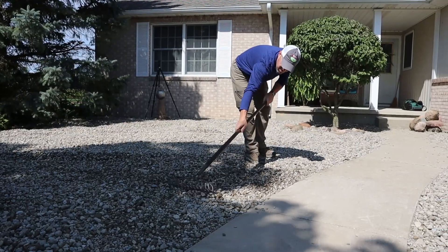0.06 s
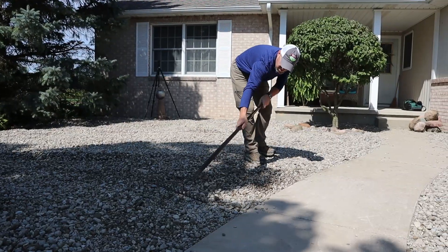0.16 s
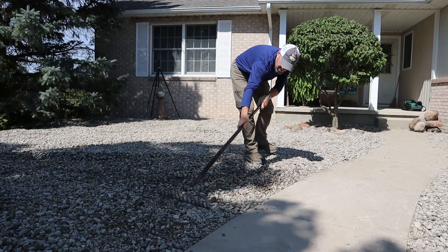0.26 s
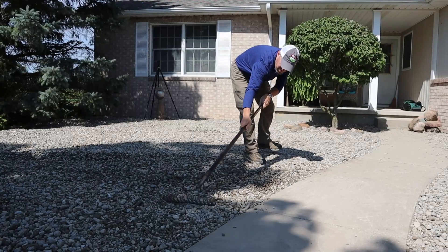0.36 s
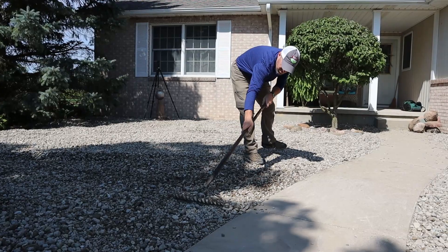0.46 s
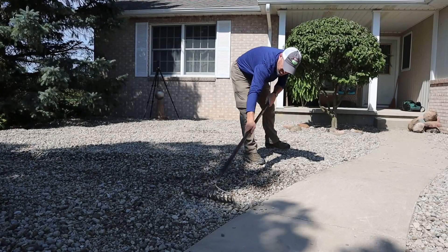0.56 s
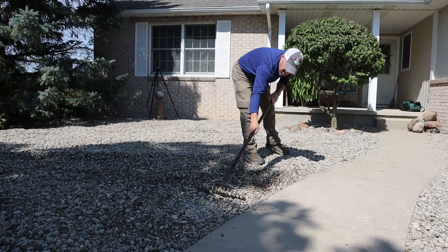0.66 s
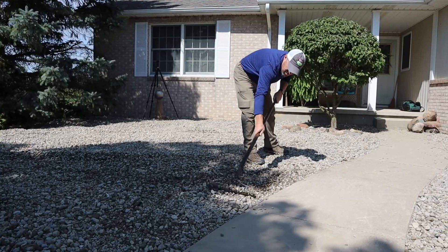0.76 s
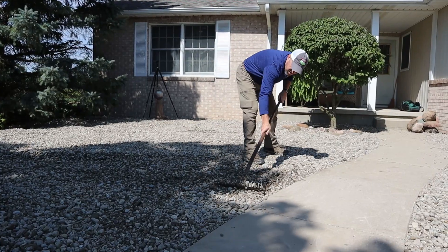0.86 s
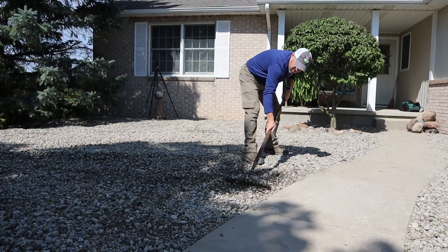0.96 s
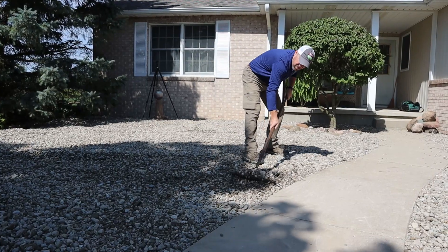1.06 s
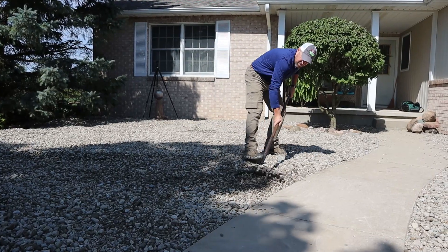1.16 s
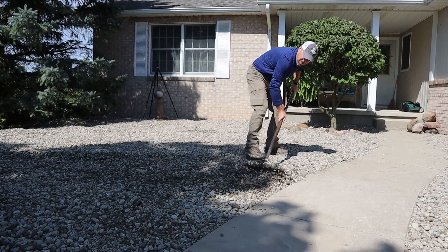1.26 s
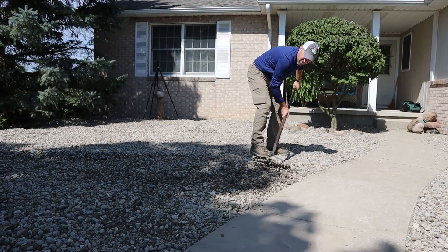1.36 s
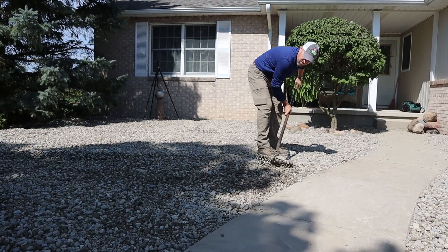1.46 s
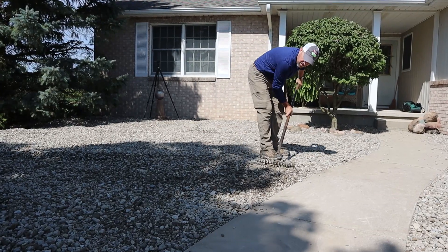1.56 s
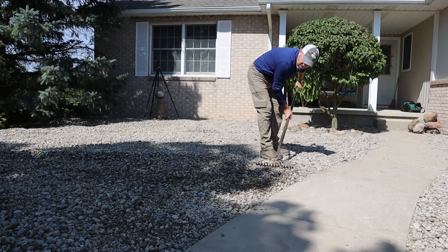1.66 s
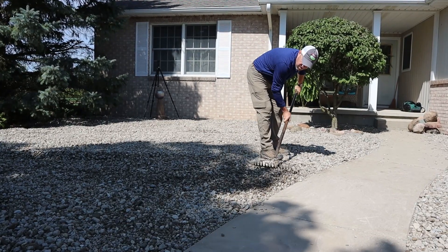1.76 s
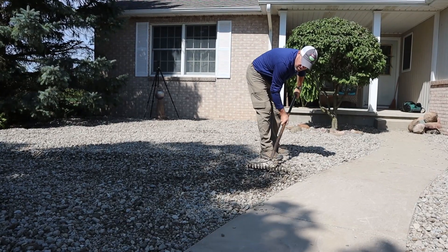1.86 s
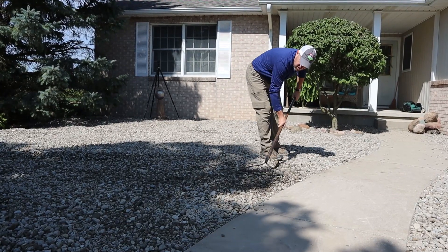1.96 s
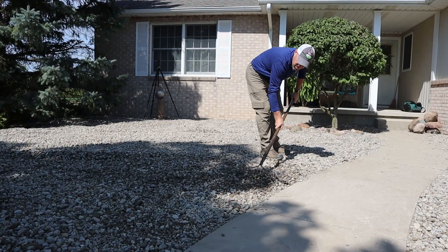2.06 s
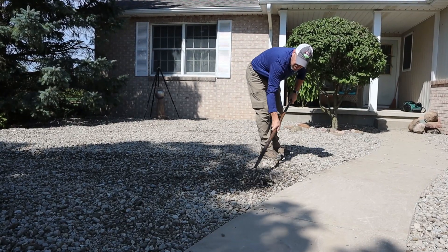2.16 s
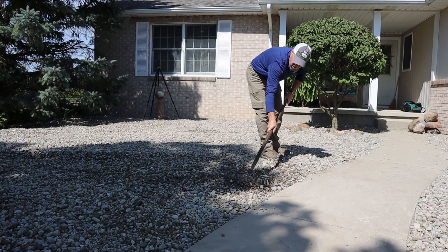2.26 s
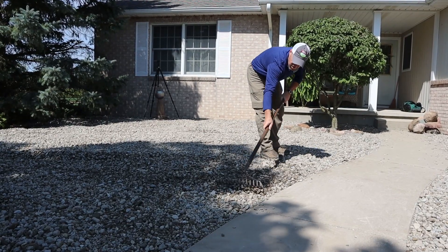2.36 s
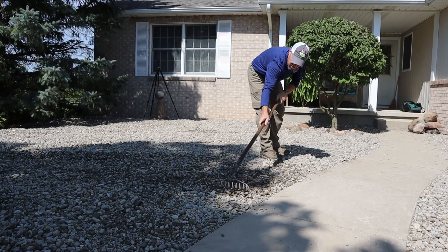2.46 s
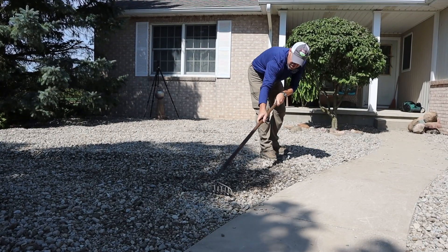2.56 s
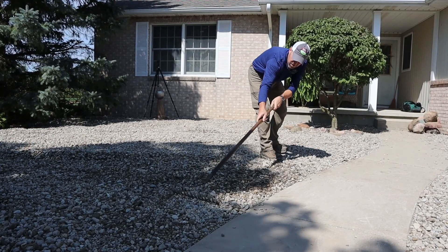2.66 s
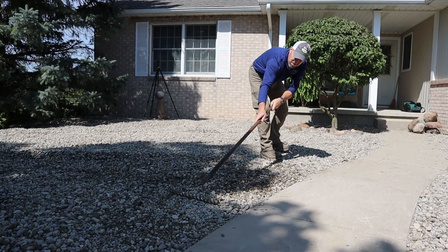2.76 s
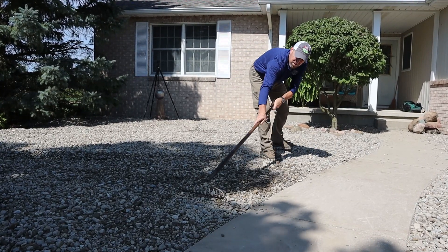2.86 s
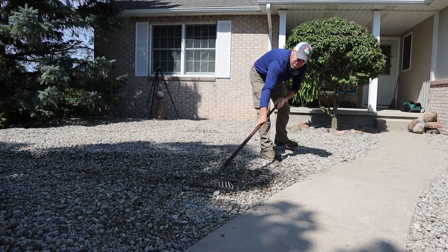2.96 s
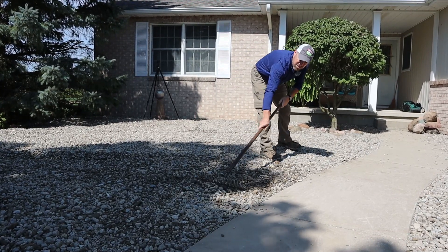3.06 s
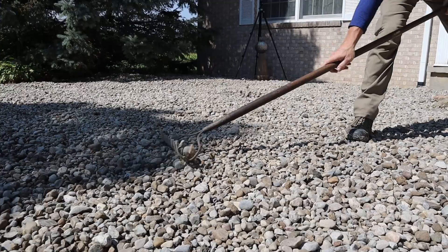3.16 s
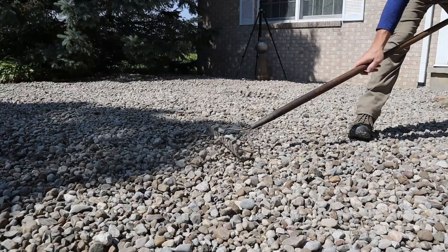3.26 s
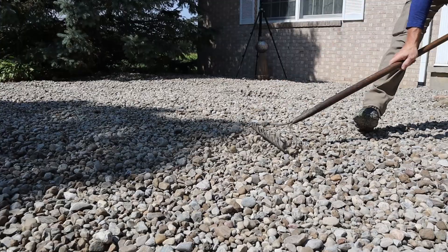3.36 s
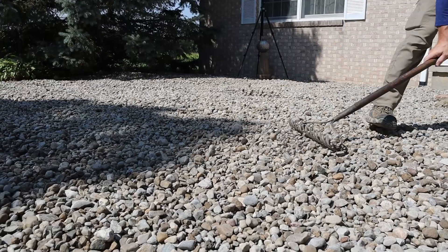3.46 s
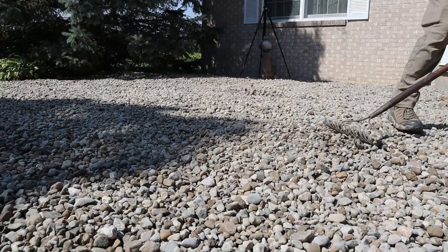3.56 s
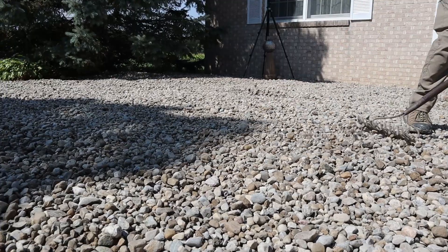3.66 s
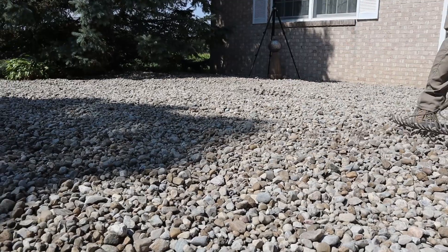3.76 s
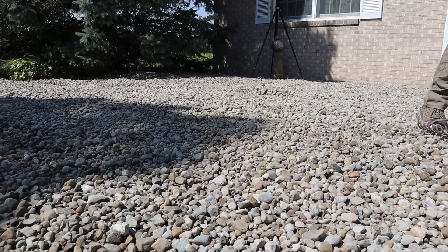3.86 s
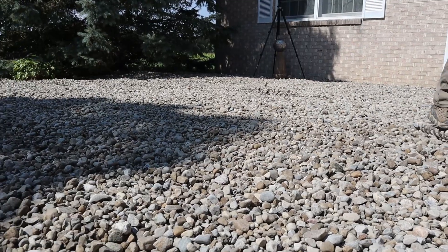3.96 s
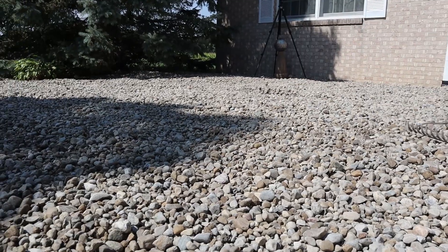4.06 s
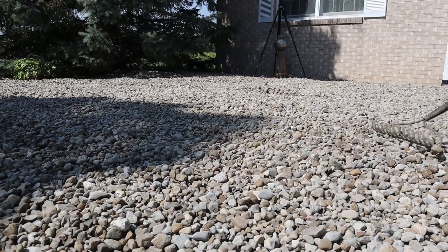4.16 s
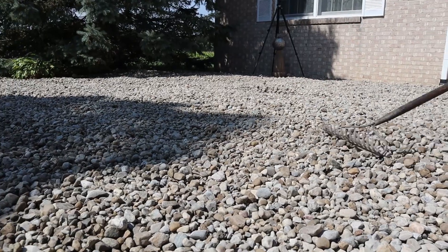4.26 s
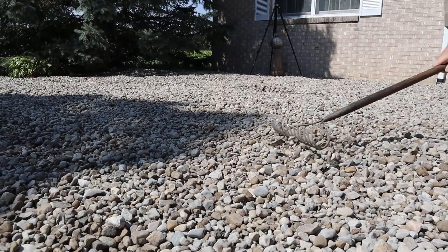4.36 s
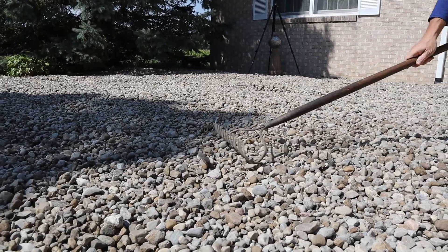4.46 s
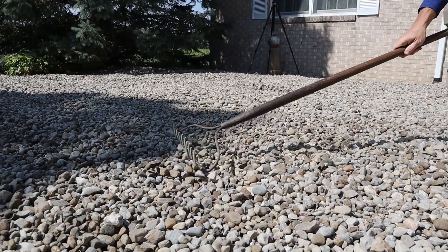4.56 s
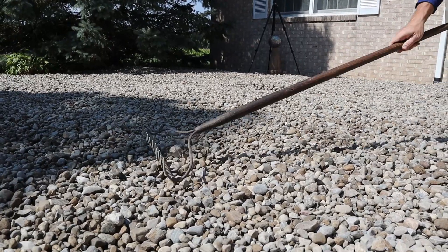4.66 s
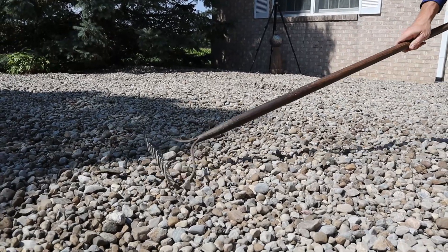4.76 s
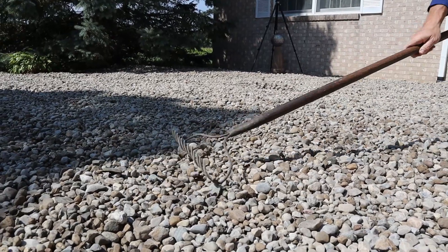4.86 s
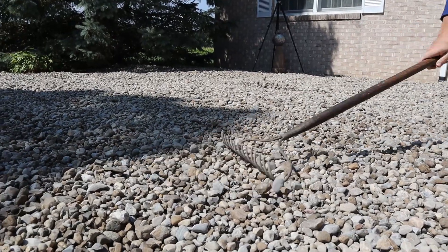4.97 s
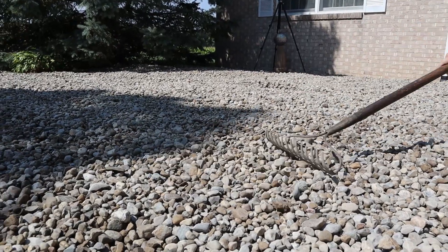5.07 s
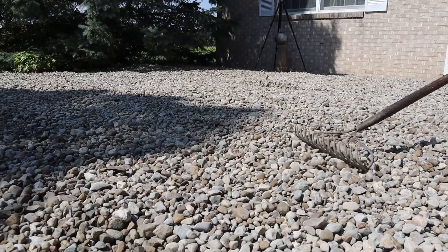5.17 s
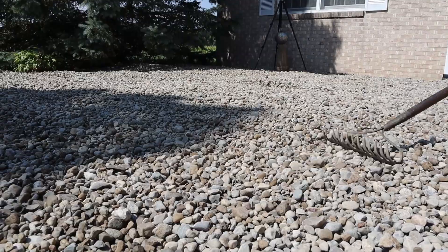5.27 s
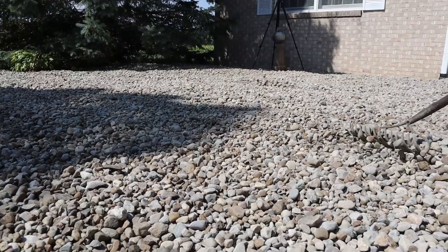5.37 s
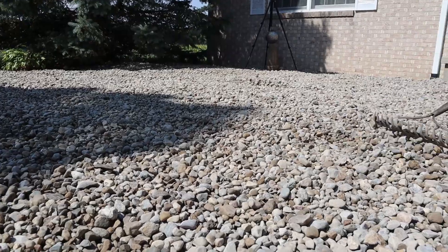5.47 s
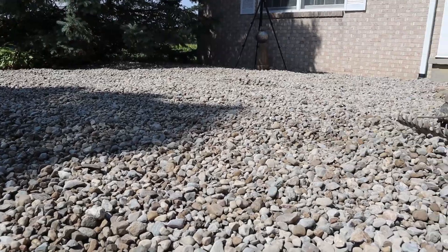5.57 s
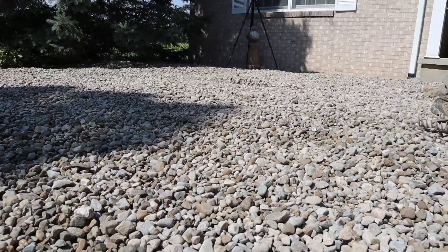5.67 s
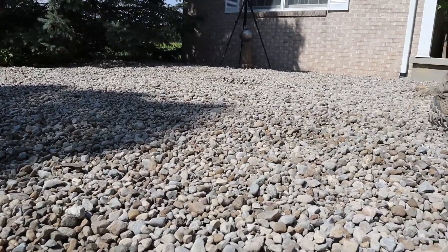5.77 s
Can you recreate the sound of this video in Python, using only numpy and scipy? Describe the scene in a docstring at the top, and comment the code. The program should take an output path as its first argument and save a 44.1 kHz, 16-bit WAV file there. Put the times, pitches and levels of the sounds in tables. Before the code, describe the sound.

A steel rake is dragged in uneven strokes through a bed of loose rounded stones. Dense clicking and rattling comes in bursts, with hard clinks and short metallic rings when the head is jerked. Quieter settling separates the strokes. Close, mono outdoor sound, with slight dull reflections from path and house wall over faint distant traffic.

```python
"""Stones click against each other in dense clumps as a steel rake is dragged and pushed through them;
the steel rings when knocked, hard jerks of the head clatter, and far traffic rumbles below.
The loose rounded stones lie in front of a house wall. Stones and steel are resonators struck by random
contacts, the dull crunch and the rumble are filtered noise, and the wall returns delayed, duller copies."""
import sys
import numpy as np
from scipy import signal
from scipy.io import wavfile

SR = 44100
rng = np.random.default_rng(int(sys.argv[2]) if len(sys.argv) > 2 else 0)


def amplitude_ratio(level_db):
    """Convert a level in decibels to the matching linear amplitude (field) ratio."""
    exponent = np.asarray(level_db, float) / 20
    return 10 ** exponent


def transcribe(u):
    """Save the signal u as a 16-bit wav file named by the first command-line argument.

    u: samples, shape (n,) or (channels, n), limited to [-1, 1]; the rate is SR.
    q: integer samples, one column per channel.
    """
    v = np.clip(np.atleast_2d(u).T, -1, 1)
    q = np.round(v * 32767).astype(np.int16)
    wavfile.write(sys.argv[1], SR, q)


N = 256353   # length in samples


def rms_one(x):
    """Normalisation: scale a signal to rms 1."""
    return x / np.sqrt(np.mean(x ** 2) + 1e-20)


def in_time(rows):
    """Linear interpolation: a curve given at times in seconds is read once a sample."""
    s, *columns = np.transpose(rows)
    return [np.interp(np.arange(N) / SR, s, c) for c in columns]


def at_hz(points, hz):
    """Spectral envelope: levels are interpolated on a log-frequency axis."""
    envelope_hz, envelope_db = np.transpose(points)
    return np.interp(np.log(hz), np.log(envelope_hz), envelope_db)


def drift(rate_hz):
    """Low-passed noise: a slow random fluctuation of rms 1, made at 1/40 of the sample rate."""
    r = np.exp(-80 * np.pi * rate_hz / SR)
    white = rng.standard_normal(N // 40 + 2002)
    slow = signal.lfilter([1], [1, -2 * r, r * r], white)[2000:]   # skip the filter's start
    return np.interp(np.arange(N) / 40, np.arange(len(slow)), rms_one(slow))


def ring(clicks, hz, t60):
    """Damped resonance: a unit click starts a sine of height 1 that falls 60 dB in t60 seconds."""
    r = amplitude_ratio(-60 / (t60 * SR))
    w = 2 * np.pi * min(hz, SR / 2.2) / SR
    return signal.lfilter([0, np.sin(w)], [1, -2 * r * np.cos(w), r * r], clicks + 1e-18)


def click(s, db):
    """Impulse excitation: a single sample at s seconds."""
    return amplitude_ratio(db) * (np.arange(N) == round(s * SR))


def band(x, low_hz, high_hz):
    """Band-pass filtering: only the part between two frequencies is kept."""
    return signal.sosfilt(signal.butter(2, [low_hz, high_hz], "band", fs=SR, output="sos"), x)


def contacts(per_s, spread_db, clump_db):
    """Random point process: contacts of uneven strength and either sign, coming in clumps."""
    sizes = amplitude_ratio(spread_db * np.minimum(rng.exponential(1, N), 5)) * rng.choice([-1, 1], N)
    chance = per_s * amplitude_ratio(clump_db * drift(25.0)) / SR
    return sizes * (rng.random(N) < chance)


def jolts(per_s, fade_s):
    """Stick-slip: tines catch and let go, so the rattle jumps up at once and fades."""
    kicks = rng.uniform(0, 1.74, N) * (rng.random(N) < per_s / SR)
    fading = signal.lfilter([1], [1, -np.exp(-1 / (fade_s * SR))], kicks + 1e-18)
    return np.sqrt(0.54 + fading)


def by_size(hz, small_db, large_db):
    """Size and pitch: high pitches follow the small stones, low pitches the large ones."""
    smallness = np.clip(np.log2(hz / 6540) * 2.5, 0, 1)
    largeness = np.clip(np.log2(3780 / hz) * 3, 0, 1)
    return smallness * small_db + largeness * large_db


def gesture(start_s, length_s, first_db, last_db, attack_s, release_db_per_s, swell_db=0):
    """Power envelope of one movement: a quick rise, a steady change with a swell, then a fall."""
    t = np.arange(N) / SR - start_s
    part = np.clip(t / length_s, 0, 1)
    db = first_db + (last_db - first_db) * part + swell_db * 4 * part * (1 - part)
    db = db - release_db_per_s * np.maximum(t - length_s, 0)
    return (amplitude_ratio(db) * np.clip(t / attack_s, 0, 1)) ** 2


# The rake moves through the bed. Each row: start in seconds, length in seconds, level in dB at the start,
# level in dB at the end, large stones in dB above the middle ones.
DRAGS = [(0.0, 0.079, -11, -37.5, -2.5), (0.051, 0.087, -24.5, -25, -5), (0.5415, 0.21, -23, -26, 0),
         (0.753, 0.66, -19.5, -27, -3.5), (1.396, 0.23, -32, -30, -21), (1.65, 0.45, -34.5, -22.5, -0.5),
         (2.112, 0.33, -26.5, -31.5, 0), (2.45, 0.064, -29.5, -27.5, -4), (2.622, 0.13, -27.5, -31, 4.5),
         (3.122, 0.65, -21, -25, 3.5), (3.809, 0.35, -34, -31, -1), (4.137, 0.12, -22.5, -28.5, 1),
         (4.249, 0.225, -19.5, -20.5, 1), (4.496, 0.15, -30.5, -28.5, 0.5),
         (4.575, 0.15, -17.5, -26.5, 4.5), (4.75, 0.074, -39, -33, 1.5), (5.036, 0.29, -22.5, -26.5, 3),
         (5.337, 0.052, -24.5, -18.5, -0.5), (5.419, 0.41, -27, -29.5, -5.5)]
# Share of small stones where the rake works. Each row: time in seconds, level in dB above the middle stones.
GRIT = [(0, 2.5), (0.6, 1.5), (2.0, 3.5), (3.1, 6.5), (3.6, -1), (3.9, -2.5), (4.3, 2.5), (4.7, 3),
        (5.3, 2.5), (5.81, 1)]


def drags():
    """Friction strokes: power of each drag, with its small and large stones in dB above the middle."""
    return [(gesture(s, length, first_db, last_db, attack_s=0.001, release_db_per_s=348, swell_db=2),
             np.interp(s + length / 2, *np.transpose(GRIT)), large_db)
            for s, length, first_db, last_db, large_db in DRAGS]


# A few stones slip and settle. Each row: start in seconds, level in dB, small stones and large stones
# in dB above the middle ones.
SLIPS = [(0.21, -32, 4.5, -24), (0.332, -27, -6.5, 1), (0.453, -37.5, -6, -6), (0.491, -33.5, 1, 5),
         (0.5165, -34.5, -8, -1), (2.917, -32, -1, -4.5), (2.962, -22, -3.5, -5.5), (3.019, -22, -3, -3),
         (4.807, -29, 1, 7.5), (4.877, -29.5, -1, -9), (4.899, -36, 2, 12.5), (4.955, -28, 0.5, 7)]


def slips():
    """Granular settling: power of each 9 ms slip, with its small and large stones in dB above the middle."""
    return [(gesture(s, 0.009, db, db, attack_s=0.001, release_db_per_s=290), small_db, large_db)
            for s, db, small_db, large_db in SLIPS]


# The head is jerked hard into the stones. Each row: start in seconds, length in seconds, level in dB
# at the start, level in dB at the end.
JERKS = [(1.238, 0.16, -19.5, -17.5), (2.1505, 0.022, -17, -14.5), (2.5427, 0.07, -13, -14.5)]


def jerks():
    """Impulsive forcing: power of each hard jerk of the head."""
    return [gesture(*row, attack_s=0.001, release_db_per_s=274) for row in JERKS]


def motion():
    """Power summation: dB level of the middle stones, and of the small and large ones above them."""
    moves = drags() + slips() + [(power, -6.5, -4.5) for power in jerks()]
    sizes = amplitude_ratio(-46.5) ** 2   # stones settling on their own
    for power, small_db, large_db in moves:
        sizes = sizes + power * amplitude_ratio(np.array([[0], [small_db], [large_db]])) ** 2
    middle_db, small_db, large_db = 10 * np.log10(sizes)
    return middle_db, small_db - middle_db, large_db - middle_db


# Spectral envelope of the stones. Each row: frequency in Hz, relative density in dB per Hz.
STONES = [(530, -38), (900, -7), (1390, -7.5), (1600, -6.5), (2170, -9.5), (2760, -10.5), (3470, -5),
          (6410, -4.5), (9650, -7.5), (13200, -20.5), (16000, -39)]


def stones(middle_db, small_db, large_db):
    """Impact resonance: each contact rings one stone, its size sets pitch and decay; gentle means sparser."""
    busy = amplitude_ratio(.5 * np.clip(middle_db + 25, -30, 5))
    rattle = jolts(45, .012)
    hits = contacts(8000 * busy, spread_db=1.7, clump_db=2) * rattle / np.sqrt(busy)
    pitches = np.geomspace(1000, 15700, num=40)
    dealt = rng.integers(0, len(pitches), N)   # which pitch a contact falls to
    out = np.zeros(N)
    for k, hz in enumerate(pitches):
        level_db = middle_db + by_size(hz, small_db, large_db) + 2.0 * drift(8.0)
        voice = rms_one(ring(hits * (dealt == k), hz, 0.008 * (4000 / hz) ** 1.1))
        # pitches are spaced in proportion to hz: the root turns density into level
        out += voice * amplitude_ratio(level_db + at_hz(STONES, hz) - 10.0) * np.sqrt(hz / 4000)
    hardest = contacts(90, spread_db=2.5, clump_db=3) * rattle
    snaps = rms_one(band(hardest, 2500, 10500))
    out += snaps * amplitude_ratio(middle_db + small_db / 2 - 9)
    # no stone rings lower than this
    return signal.sosfilt(signal.butter(8, 960, "high", fs=SR, output="sos"), out)


# Weight on the bed of stones. Each row: time in seconds, dull crunch in dB before the motion's share is added.
BED = [(0, -25.5), (2.6, -24), (3.1, -29), (4.6, -31.5), (5.81, -26.5)]


def bed(middle_db, small_db, large_db):
    """Low-frequency granular noise: stones shifting under weight give a dull, lumpy crunch."""
    # heavy stones press the bed most
    crunch_db = 0.5 * (middle_db + large_db) - .5 * small_db + in_time(BED)[0]
    return amplitude_ratio(crunch_db) * rms_one(band(contacts(2000, spread_db=4.0, clump_db=3.0), 160, 1120))


# Modes of the rake head. Each row: frequency in Hz, relative level in dB, 60 dB decay time in seconds.
RAKE = [(1122, 1.5, 0.035), (5930, -3, 0.09), (1400, 3.5, 0.031), (2097, -5.5, 0.055), (2230, 0, 0.031),
        (2587, -1, 0.049), (2940, -8, 0.075), (3134, -10, 0.056), (3495, 0.5, 0.056), (4455, -2, 0.037),
        (4750, -1, 0.047), (5480, 4, 0.04), (6730, 3, 0.032)]
# Tine tips that each ring a note of their own, in Hz.
TIPS_HZ = [9200, 9500, 10030, 10700, 11350]


def rake(middle_db, small_db, large_db, crack):
    """Modal synthesis: stones and knocks excite the steel, jerks the middle modes; each tip's level wavers."""
    hits = rms_one(contacts(600, spread_db=2.5, clump_db=3.0))
    jerk = rms_one(contacts(500, spread_db=1.0, clump_db=4.0)) * amplitude_ratio(-28.5) * np.sqrt(sum(jerks()))
    tips = [(hz, 3 * drift(6), 0.032) for hz in TIPS_HZ]
    out = np.zeros(N)
    for hz, db, t60 in RAKE + tips:
        size_db = by_size(hz, 2.3 * small_db, 1.03 * large_db)
        drive = hits * amplitude_ratio(middle_db - 0.64 * small_db + size_db - 39.0)
        drive = drive + jerk * (2000 < hz < 5000) + amplitude_ratio(-33.5) * crack
        wander = amplitude_ratio(db + 3.5 * drift(20))   # each mode with a strength of its own
        out += ring(drive * wander * rng.standard_normal(N), hz, t60)
    return out


# Spectral envelope of the rumble. Each row: frequency in Hz, relative density in dB per Hz.
TRAFFIC = [(25, 25), (115, 22.5), (648, -12.5), (1970, 4), (5250, 1.5), (15600, -25)]
# Overall level of the rumble. Each row: time in seconds, level in dB.
TRAFFIC_DB = [(0, -42.5), (3.1, -43.5), (3.2, -46.5), (5.81, -49.5)]


def traffic():
    """Band-shaped noise: far rumble in half-octave bands, each wavering."""
    edges = 30 * 2 ** np.arange(0, 9.1, .5)
    white = rng.standard_normal((2, N))   # neighbouring bands take turns
    rumble = np.zeros(N)
    for k, (low, high) in enumerate(zip(edges, edges[1:])):
        level_db = at_hz(TRAFFIC, np.sqrt(low * high)) + 2.3 * drift(2.7)
        rumble += band(white[k % 2], low, high) * amplitude_ratio(level_db)
    return amplitude_ratio(in_time(TRAFFIC_DB)[0]) * rms_one(rumble)


# Single hard knocks. Each row: time in seconds, nominal strength in dB, pitch of the struck stone in Hz.
KNOCKS = [(0.0785, -9.5, 7300), (0.085, -21.5, 1330), (0.1424, -15.5, 7200), (0.211, -26, 7440),
          (0.3365, -15, 5170), (0.4525, -15, 10700), (0.543, -12, 4600), (0.558, -16.5, 3900),
          (0.64, -33, 9000), (0.675, -10.5, 4300), (0.688, -23, 8500), (0.7441, -15, 4330),
          (0.8376, -9, 10300), (0.8651, -15, 10300), (0.967, -13, 2200), (1.1337, -8.5, 10200),
          (1.2425, -9, 4970), (1.3026, -6.5, 4740), (1.3512, -7.5, 2400), (1.375, -7, 4430),
          (1.398, -6, 6730), (1.553, -26, 4300), (2.149, -10, 2220), (2.1642, -6.5, 2450),
          (2.5281, -8.5, 11200), (2.5487, -5, 2440), (2.566, -14, 2220), (2.779, -13, 8060),
          (3.1779, -7.5, 4230), (4.139, -17, 10900), (4.2502, -5.5, 5700), (4.2751, -6.5, 5370),
          (4.322, -4, 5930), (4.4126, -9.5, 1490), (4.5905, -11, 5130), (4.9076, -15.5, 1400),
          (4.9556, -14, 4870), (5.068, -9, 3040), (5.148, -11.5, 1400), (5.3351, -11, 5600),
          (5.634, -13.5, 5530), (5.7156, -17.5, 10700)]


def knocks():
    """Impact excitation: a burst of contacts cracks around the stone's note; the crack also drives the steel."""
    drive, out, first = np.zeros((3, N))
    t = np.arange(SR // 16) / SR
    chatter = rng.standard_normal((len(KNOCKS), len(t))) ** 3
    for (s, db, hz), burst in zip(KNOCKS, chatter):
        burst = amplitude_ratio(db) * burst * amplitude_ratio(-17.5 - 60 * t / 0.065)
        burst[0] = amplitude_ratio(db - 4)   # the first contact is the hardest
        i = round(s * SR)
        crack = band(burst, hz / 1.63, min(hz * 2.32, 15000))
        note = amplitude_ratio(-12.5) * ring(burst, hz, 37.0 / hz)
        drive[i:i + len(t)] += crack[:N - i]
        out[i:i + len(t)] += (crack + note)[:N - i]
        first[i] = amplitude_ratio(db + 11)
    return drive, out + band(first, 1200, 10000)   # the first contact snaps over the whole treble


# Steel of the rake left ringing after knocks and jerks, among it the low body of the head.
# Each row: time in seconds, level in dB, frequency in Hz, 60 dB decay time in seconds.
STEEL_RINGS = [(0.136, -42.5, 1783, 0.66), (1.241, -25.5, 762, 0.17), (1.4, -30, 1257, 0.44),
               (1.423, -29, 2640, 0.51)]


def steel_rings():
    """Free vibration: once set going, the steel rings on at its own frequencies."""
    return sum(ring(click(s, db), hz, t60) for s, db, hz, t60 in STEEL_RINGS)


# A faint passing drone. Each row: time in seconds, level in dB.
DRONE = [(1.33, -70), (1.4, -43), (1.65, -47), (1.72, -53)]


def drone():
    """Amplitude modulation: a 210 Hz sine follows a level curve."""
    return amplitude_ratio(in_time(DRONE)[0]) * np.sin(2 * np.pi * 210 * np.arange(N) / SR)


# A heavy stone drops into the bed. Each row: time in seconds, click level in dB, frequency in Hz.
DROPS = [(1.66, -27, 475), (2.55, -20, 720), (2.579, -16, 750), (2.643, -20.5, 585), (2.668, -19.5, 540)]


def drops():
    """Heavily damped impact: each drop is a short low ring, kept within an octave either side."""
    return sum(band(ring(click(s, db), hz, 0.036), hz / 2, hz * 2) for s, db, hz in DROPS)


def bump():
    """Soft impact: one low resonance, band-passed twice so that it swells instead of snapping."""
    thud = ring(click(2.826, -22.5), hz=84, t60=0.12)
    return band(band(thud, 52, 110), 58, 120)


# Reflections off the path and the wall. Each row: delay in seconds, level in dB.
ECHOES = [(0.009, -14), (.06, -14)]


def yard(x):
    """Early reflection: dull, delayed copies return from the path and the house wall."""
    dull = signal.lfilter([.6], [1, -.4], x)
    out = x.copy()
    for delay, db in ECHOES:
        lag = round(delay * SR)
        out[lag:] += amplitude_ratio(db) * dull[:-lag]
    return out


def scene():
    """Superposition: stones, bed, steel and knocks in the yard, over traffic, drone and bump."""
    sizes_db = motion()   # middle, small, large
    crack, knock = knocks()
    near = stones(*sizes_db) + bed(*sizes_db) + rake(*sizes_db, crack) + knock + steel_rings() + drops()
    return (yard(near) + traffic() + drone() + bump())[None]


def low_pass(x):
    """Removes everything above the highest recorded frequency."""
    return signal.sosfilt(signal.butter(12, 16520, fs=SR, output="sos"), x)


def record(dry):
    """Transducer response: the microphone port dips the treble, peaks are rounded, the top is cut steeply."""
    dip_hz, dip_width_hz, dip_db = 6450, 700, -7
    r, w = np.exp(-np.pi * dip_width_hz / SR), 2 * np.pi * dip_hz / SR
    around_dip = signal.lfilter([(1 - r * r) / 2, 0, (r * r - 1) / 2], [1, -2 * r * np.cos(w), r * r], dry)
    coloured = dry - (1 - amplitude_ratio(dip_db)) * around_dip
    rounded = .8 * np.tanh(coloured / .8)
    mix = signal.sosfilt(signal.ellip(10, 1, 60, 15750, fs=SR, output="sos"), rounded)
    return low_pass(mix)


dry = scene()
out = record(dry)
transcribe(out)
```